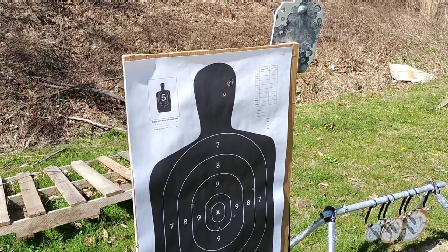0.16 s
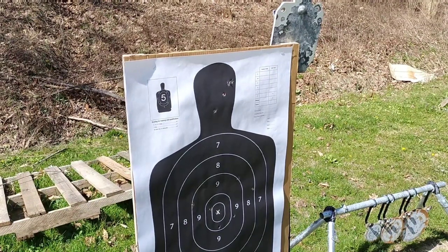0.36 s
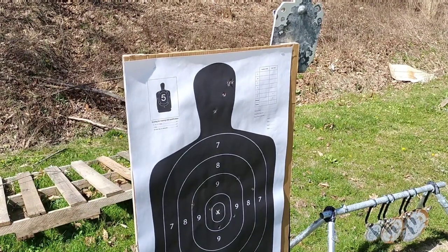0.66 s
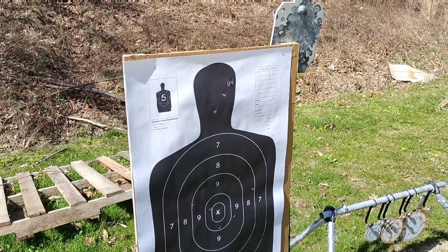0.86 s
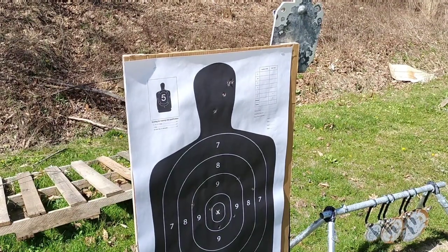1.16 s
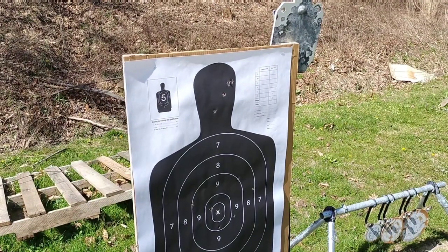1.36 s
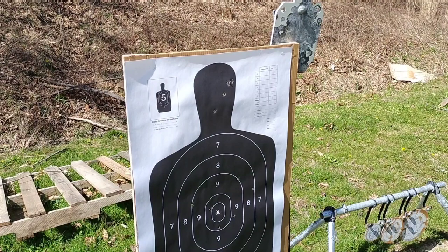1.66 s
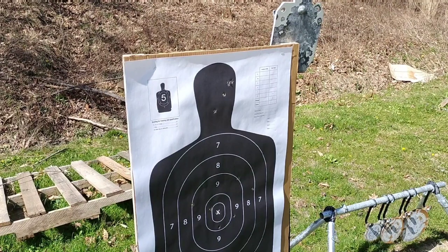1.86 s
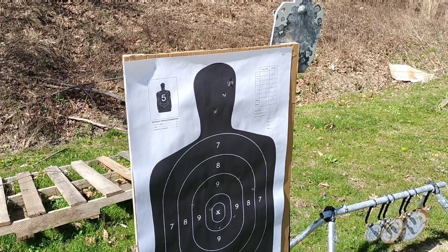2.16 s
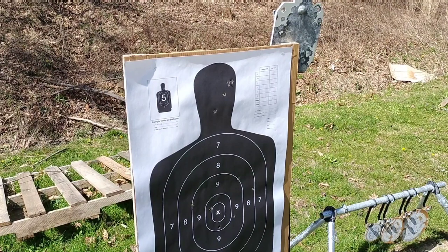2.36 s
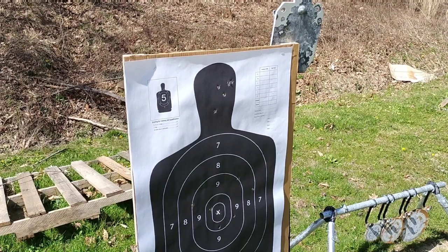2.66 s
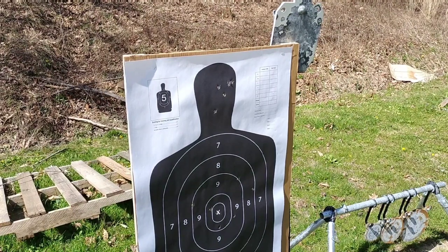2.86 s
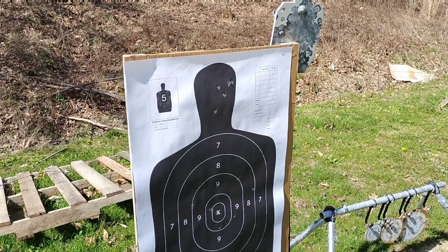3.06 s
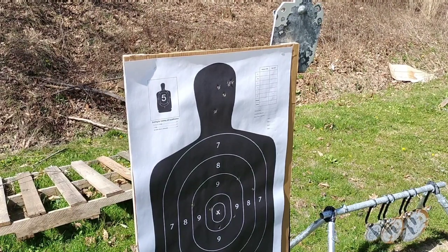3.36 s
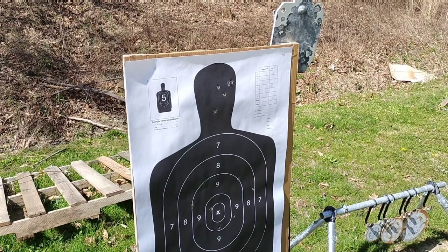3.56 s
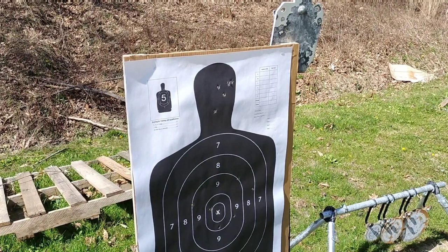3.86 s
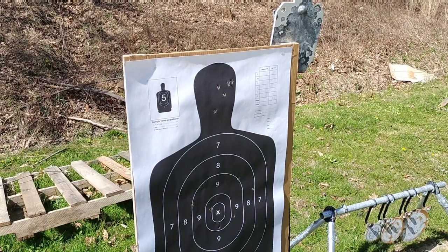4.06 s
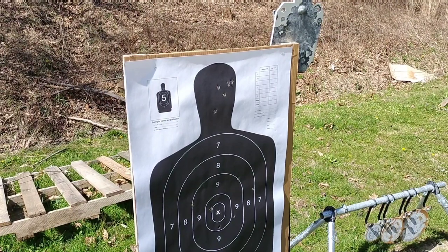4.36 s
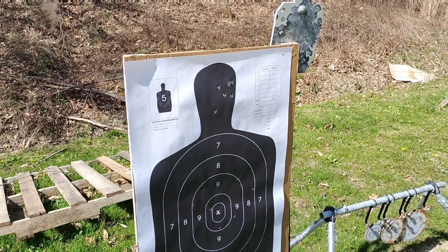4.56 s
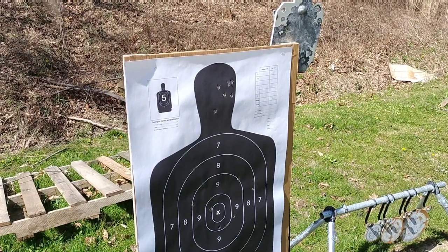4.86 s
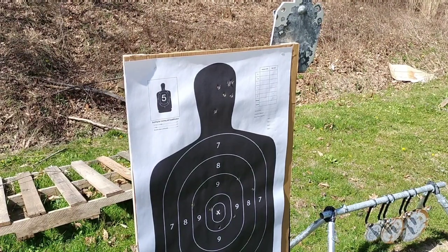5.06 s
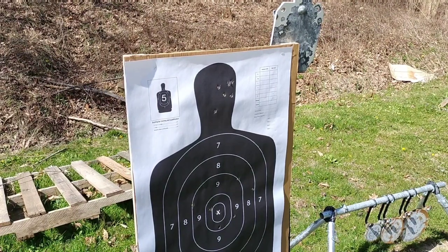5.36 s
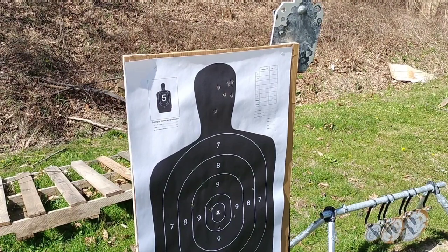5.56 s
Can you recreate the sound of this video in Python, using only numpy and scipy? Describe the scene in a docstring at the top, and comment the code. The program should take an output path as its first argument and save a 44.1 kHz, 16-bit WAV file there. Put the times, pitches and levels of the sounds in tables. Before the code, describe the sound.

An open-air range by a wooded bank, in stereo, with the microphone close to a paper target. It opens with soft, low wind rumble, faint dry leaves and a quiet distant hush. At about 0.35 s a revolver shot bursts out: an abrupt, full blast with gritty overload crackle and a low thump, then boom-and-crack reflections within a quarter second and a diffuse roll through the trees that loses its treble first and fades. Leaf rustle and ticks show around 1 to 1.3 s, with wind puffs near 1.7 and 2.3 s. A second, very similar shot comes at 2.6 s and rolls away under livelier leaves and bumpy gusts, one strong on the left at 4.1 s. The third shot hits at 4.6 s. Its roll dwindles while leaves crinkle and tick, and wind buffets again near 5.4 to 5.6 s, as it ends.

```python
"""Wind rumbles in gusts, dry leaves rustle and tick, and a distant hush lies under three revolver shots.
The shots fall at about 0.3, 2.6 and 4.6 s on an outdoor range, heard from beside a paper target.
Blast, crackle and ground scatter, all shaped noise, start together; a damped diaphragm swing,
boom-and-crack bank echoes and the woods' roll, which loses its treble first, overlap them.
After the last shot gusts and leaves go on as its roll fades."""
import sys
import numpy as np
from scipy import signal
from scipy.fft import rfft, irfft
from scipy.io import wavfile
from scipy.ndimage import uniform_filter1d, minimum_filter1d

SR = 44100
rng = np.random.default_rng(int(sys.argv[2]) if len(sys.argv) > 2 else 0)


def wav_out(sig):
    """Save sig, one row per channel (or a flat mono array), as 16-bit PCM at SR to the path in sys.argv[1]."""
    wavfile.write(sys.argv[1], SR, np.round(np.clip(np.atleast_2d(sig).T, -1, 1) * 32767).astype(np.int16))


N = 251811
SHOT_LEN = 3 * SR  # samples, woods included
NEAR_LEN = SR // 2  # samples of blast, scatter and crackle


def amp(db):
    """Decibel law: 20 dB is a factor of ten in pressure."""
    return 10 ** (np.asarray(db) / 20)


def unit(x):
    """Normalization by mean power: scales to rms 1."""
    return x / np.sqrt(np.mean(x ** 2) + 1e-20)


def read(points, hz):
    """Logarithmic frequency scale: interpolates a table along it."""
    f, value = np.transpose(points)
    return np.interp(np.log(hz + 1), np.log(f + 1), value)


def follow(rows, size, axis=1):
    """Linear interpolation: reads one column of a time curve at every sample."""
    rows = np.asarray(rows)
    return np.interp(np.arange(size) / SR, rows[:, 0], rows[:, axis])


def panned(db):
    """Constant-power panning: gains for a left minus right difference in dB."""
    gains = amp(np.array([db, -db]) / 2)
    return (gains / np.sqrt(np.mean(gains ** 2, 0))).reshape(2, -1)


def add(mix, s, sound):
    """Superposition: adds a stereo sound in at time s."""
    part = mix[:, max(round(s * SR), 0):][:, :sound.shape[1]]
    part += sound[:, :part.shape[1]]


def tint(x, spectrum, stretch=1):
    """Spectral filtering: weights noise by a table, stretched in pitch, at rms 1."""
    hz = np.fft.rfftfreq(x.shape[1], 1 / SR)
    return unit(irfft(rfft(x) * amp(read(spectrum, hz / stretch)), x.shape[1]))


def white(size):
    """Incoherence: independent white noise at the two ports."""
    return rng.standard_normal((2, size))


def blend(shared, fresh, likeness):
    """Partial correlation: mixes two noises at constant power."""
    return likeness * shared + np.sqrt(1 - likeness ** 2) * fresh


def lumps(length, size):
    """Slow random modulation: smoothed noise of rms 1, in lumps about size samples long."""
    return unit(signal.oaconvolve(rng.standard_normal(length), signal.windows.hann(size), "same"))


def burst(noise, decay, rise=0.00013):
    """Exponential decay: noise with a quick rise and a fall (seconds), at a set energy."""
    t = np.arange(noise.shape[1]) / SR
    shape = (1 - np.exp(-t / rise)) * np.exp(-t / decay)
    return unit(noise * shape) * np.sqrt(np.mean(shape ** 2))


def swell(size, peak_s, rise_db_per_s, fall_db_per_s):
    """Exponential growth and decay: in dB, a straight climb to 0 at peak_s and a straight fall."""
    t = np.arange(size) / SR - peak_s
    return np.minimum(rise_db_per_s * t, -fall_db_per_s * t)


# Left-right likeness of sound from all round. Each row: frequency in Hz, correlation from -1 to 1.
PORT_LIKENESS = [(60, -0.64), (150, 0.79), (300, 0.9), (640, 0.062), (1400, -0.22), (3000, 0.063),
                 (15000, -0.14)]


def diffuse(size):
    """Diffuse-field coherence: the likeness of the two ports depends on frequency."""
    left, other = rfft(white(size))
    same = np.clip(read(PORT_LIKENESS, np.fft.rfftfreq(size, 1 / SR)), -1, 1)
    right = same * left + np.sqrt(1 - same ** 2) * other
    return irfft(np.array([left, right]), size)


# Colour of the distant outdoor hush. Each row: frequency in Hz, relative level in dB per Hz.
HUSH_COLOUR = [(150, -53), (250, -5), (490, -3), (867, -4), (1330, -17), (1700, -14.5), (2800, -22),
               (5600, -29), (6880, -27), (9720, -47), (12400, -39), (15500, -41)]


def distant_hush(level_db=-53):
    """Incoherent summation: the distant outdoors merges into steady, diffuse noise."""
    return amp(level_db) * tint(diffuse(N), HUSH_COLOUR)


# Colour of wind turbulence at pitch factor 1. Each row: frequency in Hz, relative level in dB per Hz.
RUMBLE_COLOUR = [(10, -30), (25, -13.5), (50, -4), (100, -2), (140, -9), (200, -17), (280, -33.5),
                 (400, -56), (2000, -96)]


def eddies(stretch, lumpy_db=4.0):
    """Turbulence: eddies arrive in lumps of a cycle or two, separately at each port."""
    lump_db = lumpy_db * np.array([lumps(N, size=1300), lumps(N, size=1300)])
    swirl = tint(white(N) * amp(lump_db), RUMBLE_COLOUR, stretch)
    # dividing by the running rms evens out the slow level
    return swirl / np.sqrt(uniform_filter1d(swirl ** 2, size=5000) + 1e-6)


# Level of the wind rumble, which also dips after shots. Each row: time in seconds,
# relative level in dB, left minus right in dB.
WIND_CURVE = [(0, -31.5, 0), (.3, -35.5, 1), (.6, -41.5, 2), (1.05, -35, 0.5), (1.6, -40, 2.5),
              (1.97, -24.5, -3), (2.2, -36.5, 9), (2.9, -34.5, 4), (3.25, -27, -5.5), (3.5, -28, 2),
              (3.93, -23.5, 2.5), (4.15, -28.5, 6), (4.23, -37, 10), (4.44, -24, 10), (4.78, -39.5, 6),
              (5.2, -32.5, 2), (5.45, -23.5, 8), (5.71, -28, 2)]


def wind_rumble(level_db=1, brisk_db=-27, fine_db=-9, fine_size=1.42, fine_growth=0.42, flutter_db=2.7):
    """Aerodynamic noise: eddies rumble at the ports, with a larger share of fine ones when louder."""
    curve_db = follow(WIND_CURVE, N)
    flutter = flutter_db * np.array([lumps(N, size=6000), lumps(N, size=6000)])
    # the share of fine eddies stops growing 5 dB above the brisk level
    fine_gain = amp(fine_db + fine_growth * np.minimum(curve_db - brisk_db, 5))
    swirl = eddies(0.89) + fine_gain * eddies(fine_size)
    return swirl * amp(level_db + curve_db + flutter) * panned(follow(WIND_CURVE, N, axis=2))


# Single gusts. Each row: middle in seconds, level in dB, Gaussian half length in seconds,
# left minus right in dB, factor on pitch.
GUST_ROWS = [(.124, -33, 0.025, 21, 0.89), (1.054, -36, 0.03, 9, 0.55), (1.492, -29, 0.021, 15, 1),
             (1.748, -21, .014, -18, 0.92), (1.838, -28.5, 0.0073, 2, 2.5),
             (2.217, -20.5, 0.0077, -15, 0.76), (2.347, -24, 0.0017, 18, 2.14),
             (2.363, -18, 0.0094, 4.5, 0.68), (3.029, -17.5, 0.011, -2.5, 1.07),
             (3.316, -22.5, 0.035, -0.5, 1.48), (3.848, -25, 0.091, 1.5, 1.58),
             (4.108, -19.5, 0.0012, 21, 4.6), (4.112, -10.5, 0.0081, 25, 1.5),
             (5.29, -24.5, .02, 13.5, 1.57), (5.391, -17.5, 0.0052, 15, 1.14),
             (5.524, -16.5, 0.0038, 0, 2.25), (5.561, -12, 0.032, 1, 1.34), (5.572, -24, .016, 2, 4)]


def gusts():
    """Transient turbulence: single eddies strike the ports as rumble in a Gaussian envelope."""
    out, t = np.zeros((2, N)), np.arange(-SR // 4, SR // 4) / SR
    for s, db, half, pan_db, stretch in GUST_ROWS:
        shape = np.exp(-(t / half) ** 2 / 2)
        rumble = tint(white(len(t)), RUMBLE_COLOUR, stretch) * shape
        puff = np.array([unit(port) for port in rumble])
        puff = amp(db) * panned(pan_db) * puff * np.sqrt(np.mean(shape ** 2))
        add(out, max(s + t[0], 0), puff[:, s + t >= 0])
    return out


# Level of the dry leaves. Each row: time in seconds, relative level in dB.
RUSTLE_CURVE = [(0, -76.5), (.6, -73), (1.15, -65), (1.85, -87), (2.4, -98.5), (2.9, -61.5), (3.78, -64),
                (4.39, -72.5), (4.95, -59), (5.71, -63)]
# Colour of the dry leaves. Each row: frequency in Hz, relative level in dB per Hz.
LEAF_COLOUR = [(500, -39), (2000, 0), (4000, 3), (7300, 3.5), (9000, -8.5), (11000, -6), (15500, -9.5)]


def leaf_rustle(level_db=9, grain_db=1.0, grains_per_s=1500, grain_share=0.81):
    """Granular noise: countless small contacts give a hiss, and sparse random ones a crinkle."""
    sizes = amp(grain_db * np.minimum(rng.exponential(1, (2, N)), 5))
    struck = rng.random((2, N)) < grains_per_s / SR
    grains = unit(white(N) * sizes * struck)
    return tint(white(N) + grain_share * grains, LEAF_COLOUR) * amp(level_db + follow(RUSTLE_CURVE, N))


# Ticks of leaves and of the paper target at set times. Each row: start in seconds,
# relative level in dB, decay in seconds, factor on pitch.
TICK_ROWS = [(0.092, -44, 0.0035, 0.31), (.992, -50, .003, 1.04), (1.048, -47, 0.0045, 1),
             (1.129, -49, 0.01, 1.25), (1.334, -42.5, 0.02, 0.99), (1.639, -57.5, 0.0074, 1.03),
             (3.351, -45, 0.0037, 1.26), (3.896, -47.5, 0.015, 0.98), (4.15, -46, .003, 0.8),
             (4.185, -45, 0.0037, 0.8), (4.233, -49, .003, 1.05), (4.2561, -50.5, .011, 1.03),
             (5.6073, -43.5, 0.0073, 1.1), (5.673, -40.5, .003, .87)]
# Colour of a tick at pitch factor 1. Each row: frequency in Hz, relative level in dB per Hz.
TICK_COLOUR = [(1000, -13), (3000, -6), (5000, 2.5), (7500, 1), (9500, -10), (15500, -14)]


def ticks(level_db=1.5, random_per_s=6.3, random_db=20, random_spread_db=6, random_decay_s=0.0048):
    """Impulse excitation: near leaves and the paper target tick as short, decaying noise."""
    out = np.zeros((2, N))
    for s, db, decay, stretch in TICK_ROWS:
        add(out, s, amp(db + level_db) * burst(tint(white(SR // 8), TICK_COLOUR, stretch), decay))
    # further ticks fall at random, some as strong as the listed ones; their level follows the rustle
    struck = rng.random(N) < random_per_s / SR
    random_gain = amp(random_db - random_spread_db * rng.random((2, N)) + follow(RUSTLE_CURVE, N))
    tick = burst(tint(white(SR // 8), TICK_COLOUR), random_decay_s)
    return out + signal.oaconvolve(struck * random_gain, tick, axes=1)[:, :N]


# Colour of the woods' roll 0.35 s into the shot; before that the roll is brighter, and its colour holds until
# 0.17 s. Each row: frequency in Hz, relative level in dB per Hz.
WOODS_COLOUR = [(88, -32), (150, -11), (234, -10), (405, -4), (473, -4), (561, -1.5), (938, -4.5),
                (1040, -8.5), (1680, -12.5), (2100, -11), (2810, -20), (3390, -19), (4380, -27),
                (6730, -35.5), (9000, -53.5), (11700, -85), (19800, -120)]
# Decay of that colour. Each row: frequency in Hz, time in seconds to fall 60 dB.
WOODS_DECAY = [(100, 1.7), (300, 3.93), (700, 3.74), (1300, 3.2), (2300, 2.35), (4000, 1.26), (7000, 0.73),
               (12000, 0.46)]


def woods(trunks, level_db=-25.5, patchy_db=1.45, colour_age=0.35):
    """Reverberation: countless trunks return the shot, the air takes the treble first, clumps flutter."""
    hz, t, z = signal.stft(tint(trunks, WOODS_COLOUR), SR, nperseg=512)
    patches = uniform_filter1d(rng.standard_normal(z.shape[1:]), size=2, axis=1)  # along time
    patches = unit(uniform_filter1d(patches, size=14, axis=0))  # along frequency
    # the colour holds at first, then each band decays at its own rate
    decay_db = -60 * np.maximum(t - colour_age, -.18) / read(WOODS_DECAY, hz)[:, None]
    roll = signal.istft(z * amp(patchy_db * patches + decay_db), SR, nperseg=512)[1][:, :SHOT_LEN]
    # the woods fill slowly; a slight fall adds to the decay of the bands
    return roll * amp(level_db + swell(SHOT_LEN, peak_s=0.092, rise_db_per_s=118, fall_db_per_s=0.75))


# The direct blast front, then single reflections. Each row: delay in seconds, boom level in dB,
# boom frequency in Hz, boom cycles up to its peak, crack level in dB, crack energy decay in seconds,
# factor on crack pitch, lag of the left port in seconds.
ARRIVAL_ROWS = [(.0007, -7, 340, .6, -13, 0.002, 1, .00045), (.0082, 4, 586, .8, -6.5, .002, 1, .0001),
                (.041, -18, 860, 1.6, -13.5, .002, 1.1, .0002), (.048, -33, 880, 1.3, -12, .0015, 1.1, 0),
                (.0737, -2.5, 498, 0.74, -13, 0.0018, 0.73, -.0002),
                (.086, -11.5, 430, 0.71, -24, .002, 1, .0002),
                (.091, -20, 473, 1.2, -10.5, 0.0021, 0.86, -.0002),
                (0.1092, -15.5, 440, 0.71, -10.5, 0.0025, 1.47, .0003),
                (.1466, -10, 374, 0.63, -13.5, 0.003, 1, 0), (.152, -8, 810, 1.1, 1, .0008, 1.08, -.0001),
                (.211, -0.5, 795, 1.13, -2, .0023, 1, .00045),
                (0.226, -12.5, 912, 0.85, -13, 0.002, 0.98, .0003),
                (.5735, -16, 746, 1.3, -25.5, 0.0014, 1, -.00025)]
# Colour of the crack at pitch factor 1. Each row: frequency in Hz, relative level in dB per Hz.
CRACK_COLOUR = [(200, -7.5), (800, 10.5), (1250, -17), (1800, 3.5), (2250, -1), (2750, 0), (3600, -1.5),
                (4500, -14), (6500, -18.5), (9000, -37.5), (15000, -44)]


def arrival(grain, boom_db, boom_hz, cycles, crack_db, crack_decay, crack_pitch, lag):
    """Phase dispersion: one wavefront is a boom of a few cycles under a crack smeared in time."""
    size = grain.shape[1]
    turns = boom_hz * np.arange(size) / SR
    u = turns / cycles
    boom = u ** 3 * np.exp(3 * (1 - u)) * np.sin(2 * np.pi * turns)
    # each frequency is delayed by its own amount, but all are kept
    phase = np.angle(rfft(burst(grain, crack_decay, rise=0.0007)))
    smear = irfft(np.exp(1j * phase), size)
    # pressure decays over twice the energy decay time
    crack = burst(tint(smear, CRACK_COLOUR, crack_pitch), 2 * crack_decay, rise=0.0011)
    sound = amp(boom_db) * boom + amp(crack_db) * crack
    delays = np.maximum([[lag], [-lag]], 0)  # the far port hears it later
    return irfft(rfft(sound) * np.exp(-2j * np.pi * delays * np.fft.rfftfreq(size, 1 / SR)), size)


def front_and_echoes(grains, sway_db=1.2):
    """Image sources: the direct front, then each reflection after its delay, slightly random in level."""
    out = np.zeros((2, SHOT_LEN))
    sways = amp(sway_db * rng.standard_normal(len(ARRIVAL_ROWS)))
    for grain, sway, (delay, *wavefront) in zip(grains, sways, ARRIVAL_ROWS):
        add(out, delay, sway * arrival(grain, *wavefront))
    return out


def past_bank(bank_s=0.1386, fade_s=0.016):
    """Limited path length: goes from 0 to 1 beyond the last near bank, where near sound drops away."""
    return np.clip((np.arange(NEAR_LEN) / SR - bank_s) / fade_s, 0, 1)


# Colour of the scatter. Each row: frequency in Hz, relative level in dB per Hz.
SCATTER_COLOUR = [(100, -24), (220, -15), (380, 4), (500, -4.5), (650, 1.5), (850, -15), (1150, -11),
                  (1600, -11), (2100, -4.5), (2900, -20), (4000, -21.5), (7300, -22), (9000, -38),
                  (15000, -67)]


def range_scatter(noise, clutter_db):
    """Scattering: the ground underfoot answers at once, the frames as the blast reaches them."""
    underfoot = amp(-13 - 380 * np.arange(NEAR_LEN) / SR)  # falls 380 dB per second
    frames_db = -15.5 + swell(NEAR_LEN, peak_s=0.094, rise_db_per_s=340, fall_db_per_s=90)
    frames = amp(frames_db - 12 * past_bank())
    return tint(noise, SCATTER_COLOUR) * np.hypot(underfoot, frames) * amp(clutter_db)


# The diaphragm's swings. Each row: start in seconds, left level in dB, right level in dB.
THUMP_ROWS = [(0.368, -1, -3), (2.5943, -9, -34), (2.6243, -21, -5.5), (4.6108, -9.5, -2)]


def diaphragm_thumps(swing_hz=58, decay=0.007, rise=0.00032):
    """Damped oscillation: the overloaded diaphragm is sucked outward and swings back once, slowly."""
    out, t = np.zeros((2, N)), np.arange(SR // 12) / SR
    swing = -(1 - np.exp(-t / rise)) * np.exp(-t / decay) * np.cos(2 * np.pi * swing_hz * t + 0.51)
    for s, left_db, right_db in THUMP_ROWS:
        add(out, s, amp([[left_db], [right_db]]) * swing)
    return out


# Colour of the overload crackle. Each row: frequency in Hz, relative level in dB per Hz.
CRACKLE_COLOUR = [(150, 7), (900, 9), (1400, -4), (3200, 2.5), (5500, -2.5), (7500, -1), (9200, -16.5),
                  (10500, -9.5), (15500, -15)]


def overload_crackle(level_db=-18.5, spiky_db=2):
    """Overload distortion: spurts of noise stand for a microphone driven past its range."""
    spurts = unit(lumps(NEAR_LEN, size=60) + lumps(NEAR_LEN, size=420))
    crackle = tint(white(NEAR_LEN) * amp(spiky_db * spurts), CRACKLE_COLOUR)
    envelope_db = level_db + swell(NEAR_LEN, peak_s=0.021, rise_db_per_s=478, fall_db_per_s=95)
    return crackle * amp(envelope_db - 10 * past_bank())


# Colour of the muzzle blast. Each row: frequency in Hz, relative level in dB per Hz.
BLAST_COLOUR = [(59, -53), (100, 6.5), (614, -7), (1310, -5.5), (2180, -5.5), (2630, -23.5), (3250, -11),
                (4370, -14.5), (5070, -18), (6950, -21), (8950, -57), (11500, -22.5), (15500, -20)]


def muzzle_blast(noise, level_db=-17, hold_s=0.02, fall_db_per_s=414):
    """Impulsive radiation: the blast starts at full level, holds for a moment, then dies."""
    t = np.arange(NEAR_LEN) / SR
    return tint(noise, BLAST_COLOUR) * amp(level_db - fall_db_per_s * np.maximum(t - hold_s, 0))


# The shots. Each row: start in seconds, level of the whole shot in dB, and relative to it
# the crackle in dB and the rolling tail in dB.
SHOT_ROWS = [(0.3467, -1.5, 4, 1), (2.5742, -0.5, 2.5, 0), (4.5608, -1, 5, 1)]


def shots(likeness=0.64, far_likeness=0.81, ragged_db=5.0):
    """Impulse response: gun and microphone stay put, so every shot takes nearly the same paths."""
    out = np.zeros((2, N))
    gun, ground, trunks = diffuse(NEAR_LEN), diffuse(NEAR_LEN), diffuse(SHOT_LEN)
    clutter_db = ragged_db * lumps(NEAR_LEN, size=220)
    grains = rng.standard_normal((len(ARRIVAL_ROWS), 1, SR // 20))
    for s, level_db, crackle_db, tail_db in SHOT_ROWS:
        shot = amp(tail_db) * woods(blend(trunks, diffuse(SHOT_LEN), far_likeness))
        add(shot, 0, muzzle_blast(blend(gun, diffuse(NEAR_LEN), likeness)))
        add(shot, 0, range_scatter(blend(ground, diffuse(NEAR_LEN), likeness), clutter_db))
        add(shot, 0, amp(crackle_db) * overload_crackle())
        # the moving air bends each path a little differently from shot to shot
        bent = blend(grains, rng.standard_normal(grains.shape), far_likeness)
        add(shot, 0, front_and_echoes(bent))
        add(out, s, amp(level_db) * shot)
    return out


def scene():
    """Superposition: hush, wind and leaves lie under the shots and the diaphragm's thumps."""
    background = distant_hush() + wind_rumble() + gusts() + leaf_rustle() + ticks()
    return background + diaphragm_thumps() + shots()


def record(dry):
    """Peak limiting, then band limiting: a fast gain holds peaks down before a lowpass."""
    ceiling = .86  # of full scale, ahead of the lowpass
    gain = np.minimum(ceiling / (abs(dry) + 1e-9), 1)
    gain = uniform_filter1d(minimum_filter1d(gain, size=61), size=61)
    lowpass = signal.firwin(511, 15750, window=("kaiser", 9), fs=SR)  # edge in Hz
    return signal.oaconvolve(dry * gain, lowpass[None], "same")


dry = scene()
out = record(dry)
wav_out(out)
```